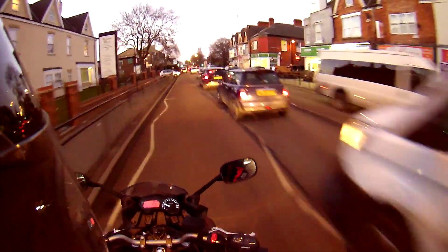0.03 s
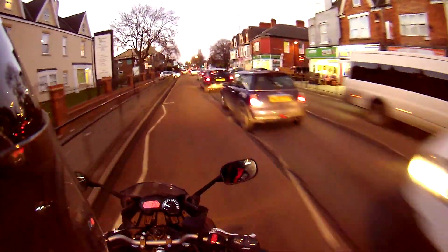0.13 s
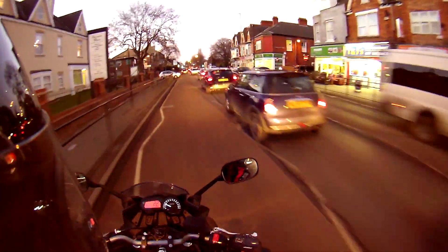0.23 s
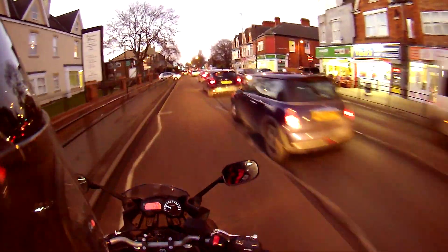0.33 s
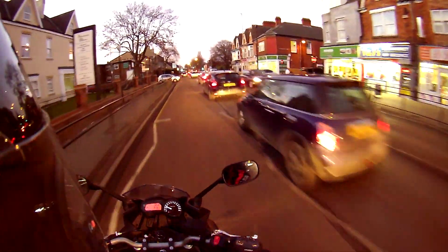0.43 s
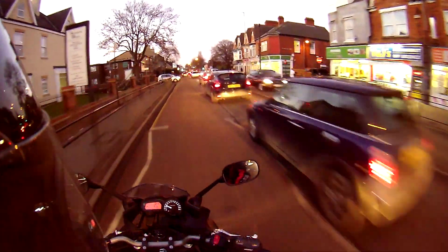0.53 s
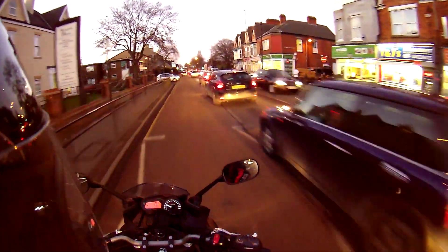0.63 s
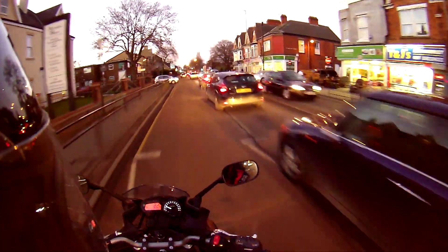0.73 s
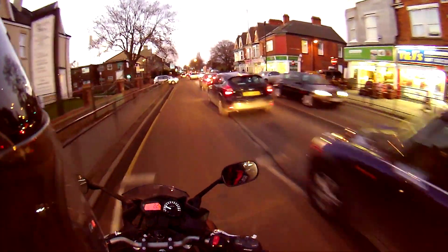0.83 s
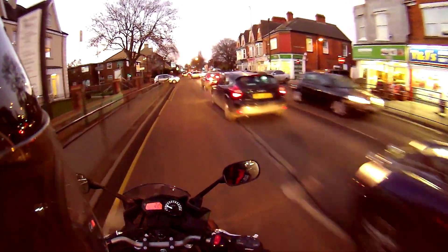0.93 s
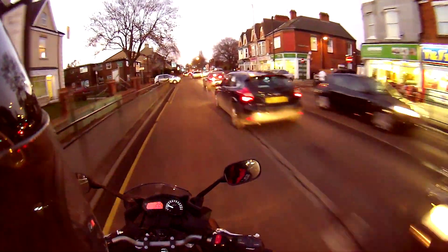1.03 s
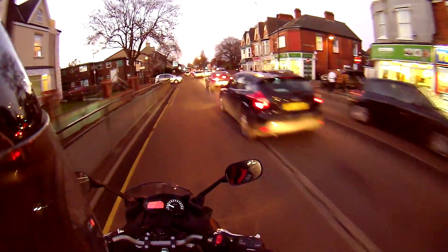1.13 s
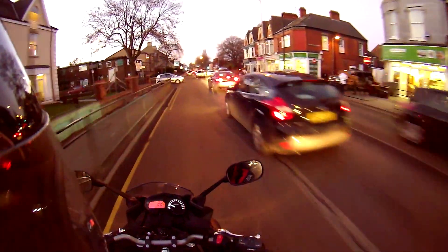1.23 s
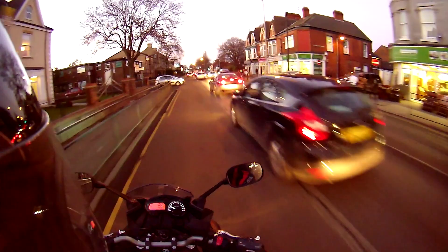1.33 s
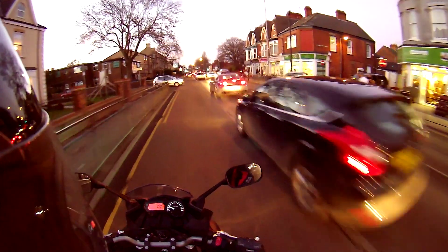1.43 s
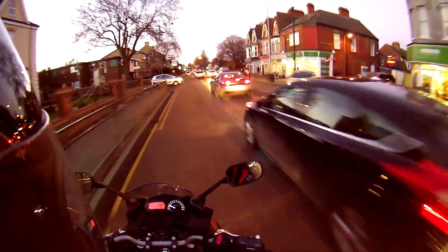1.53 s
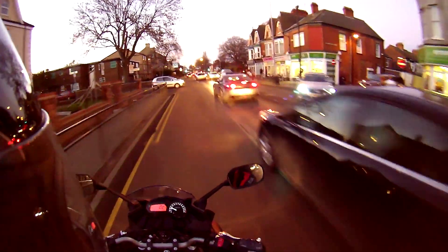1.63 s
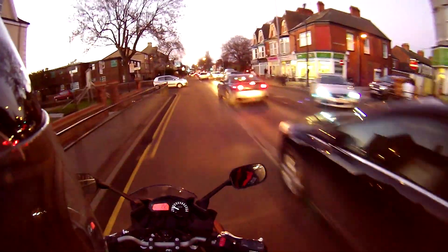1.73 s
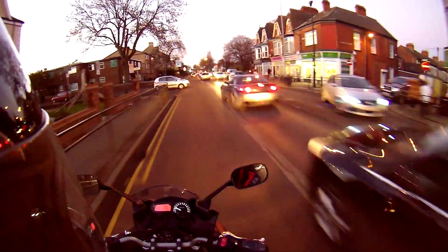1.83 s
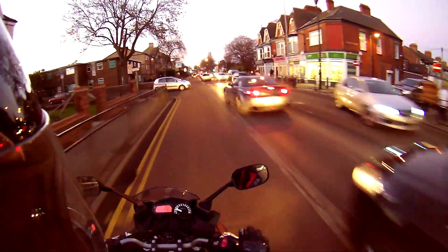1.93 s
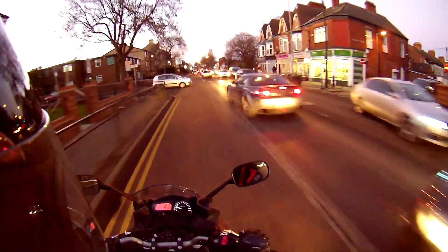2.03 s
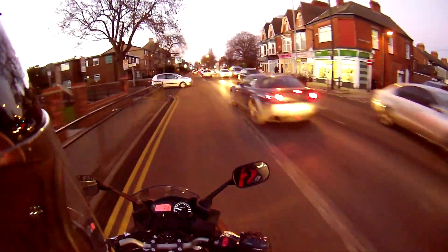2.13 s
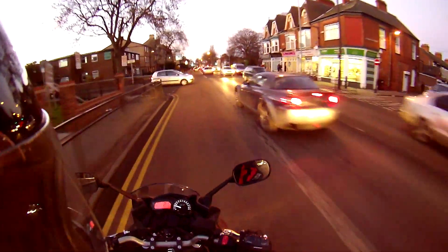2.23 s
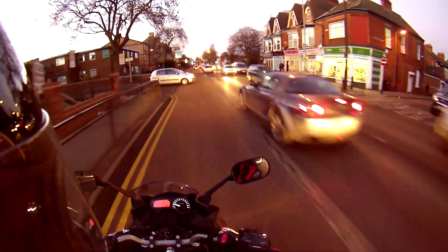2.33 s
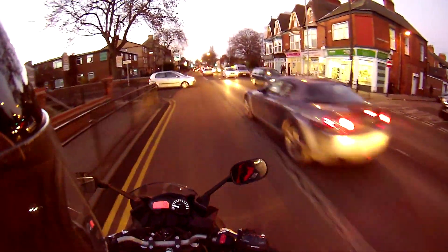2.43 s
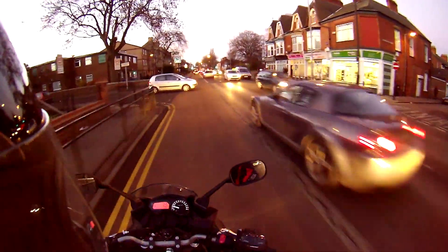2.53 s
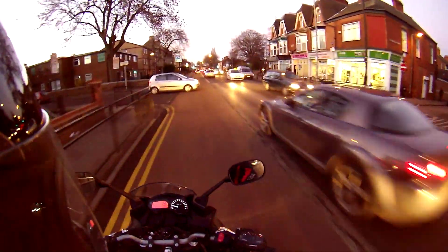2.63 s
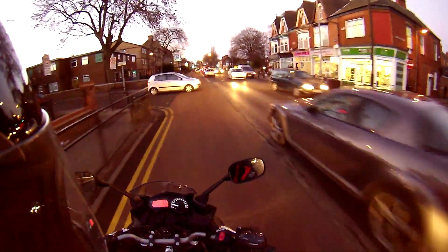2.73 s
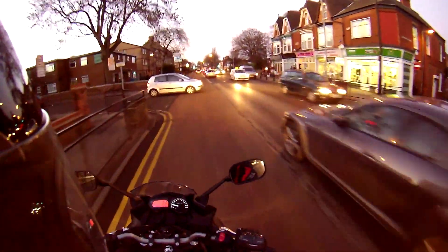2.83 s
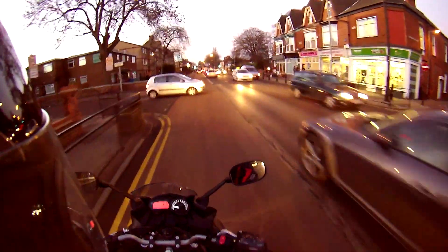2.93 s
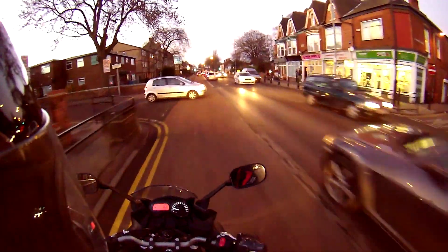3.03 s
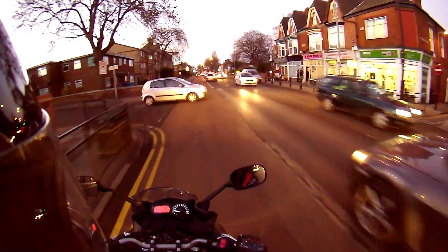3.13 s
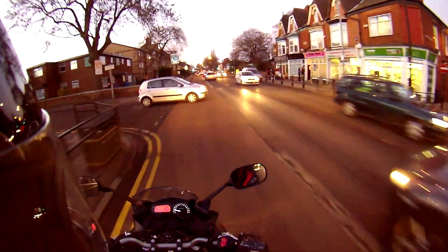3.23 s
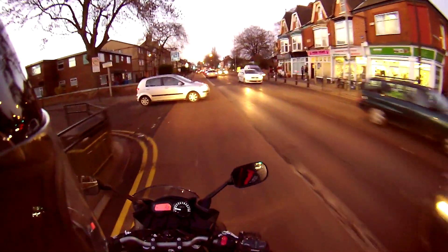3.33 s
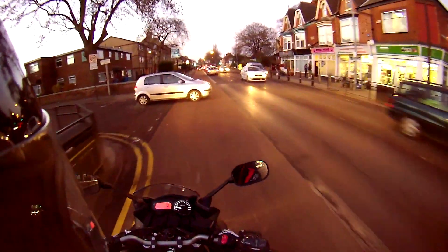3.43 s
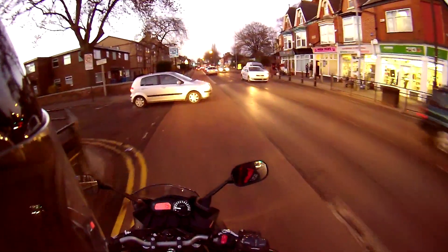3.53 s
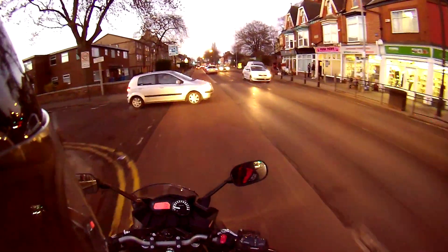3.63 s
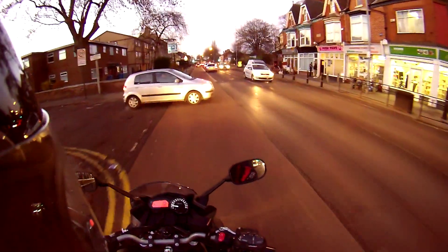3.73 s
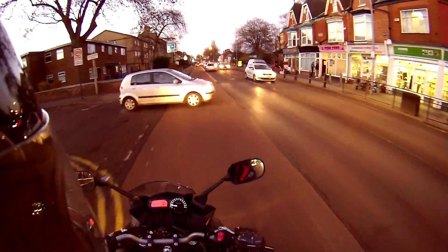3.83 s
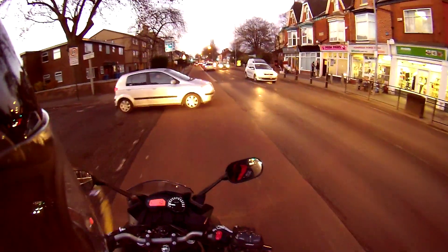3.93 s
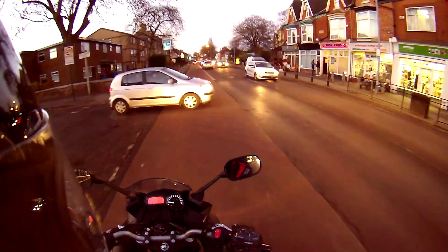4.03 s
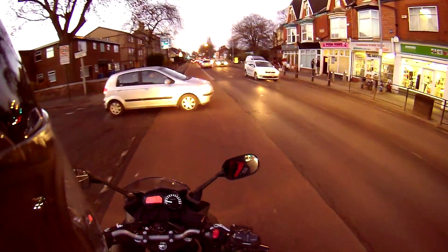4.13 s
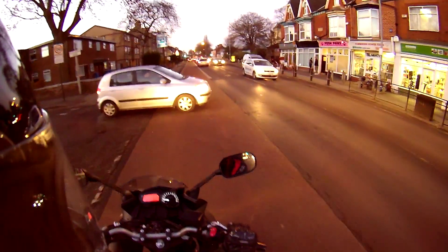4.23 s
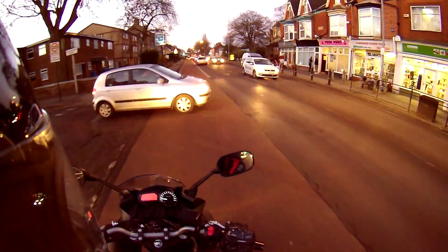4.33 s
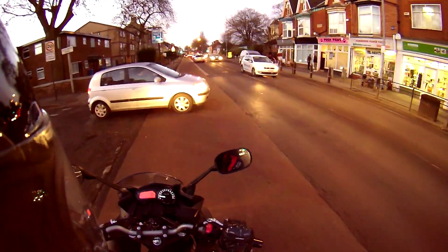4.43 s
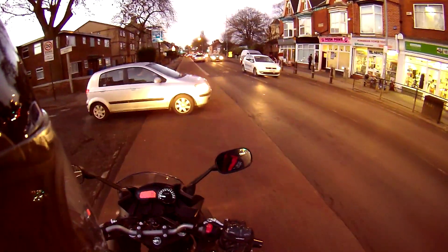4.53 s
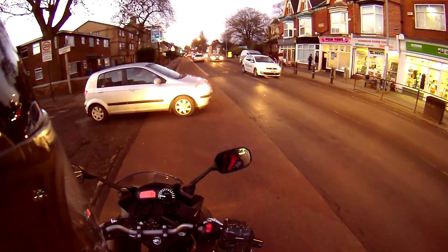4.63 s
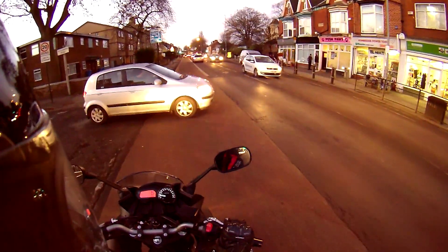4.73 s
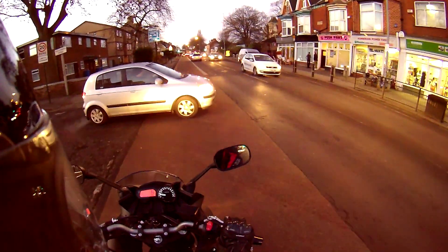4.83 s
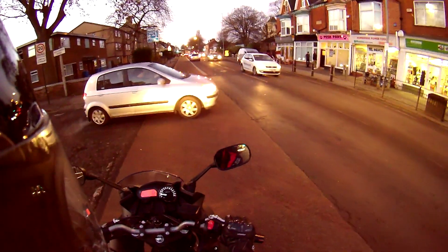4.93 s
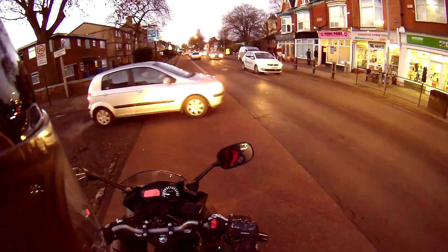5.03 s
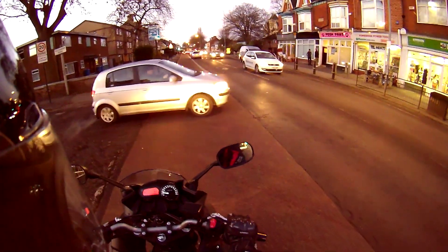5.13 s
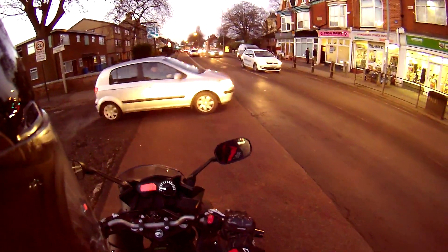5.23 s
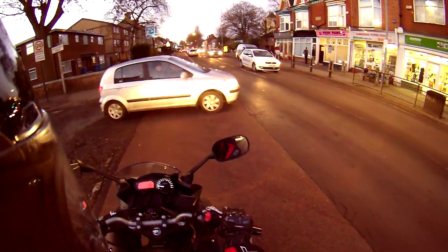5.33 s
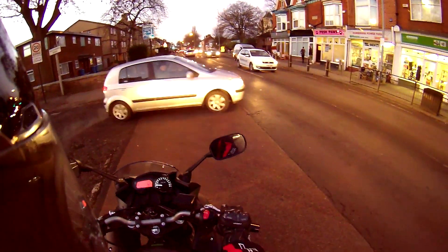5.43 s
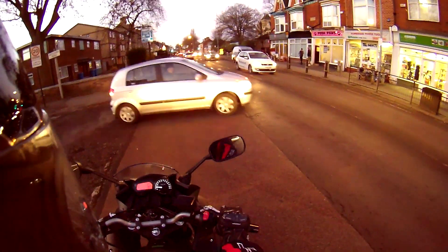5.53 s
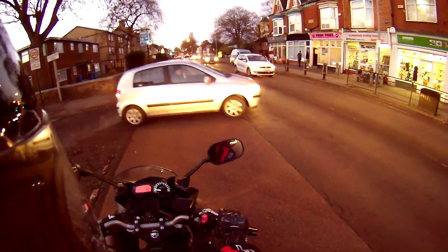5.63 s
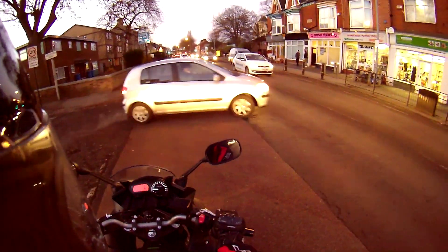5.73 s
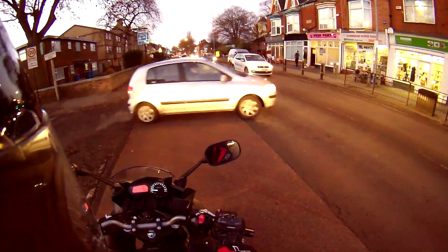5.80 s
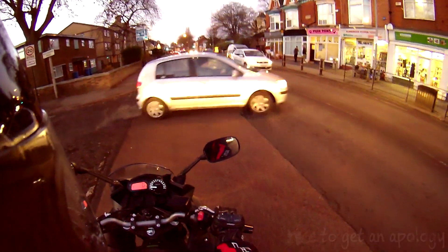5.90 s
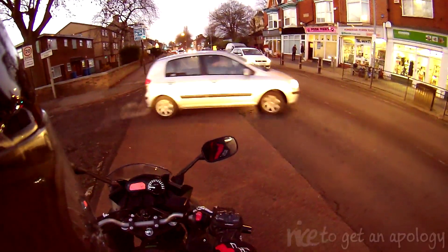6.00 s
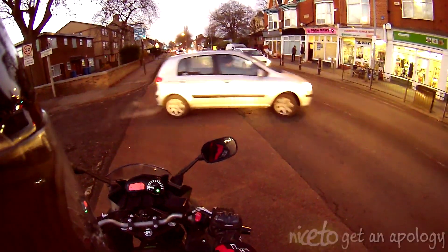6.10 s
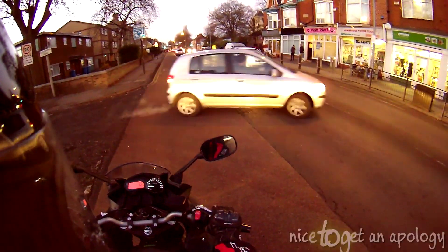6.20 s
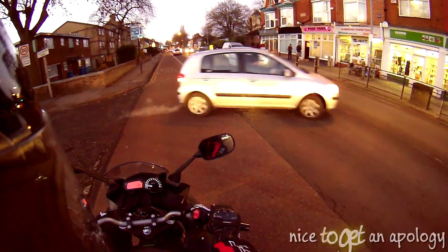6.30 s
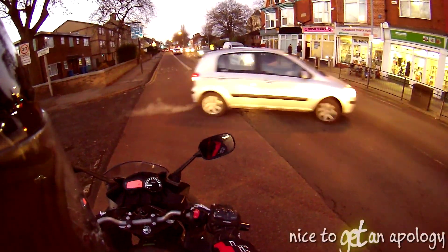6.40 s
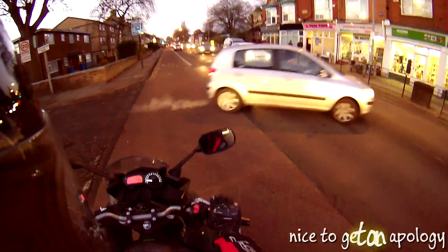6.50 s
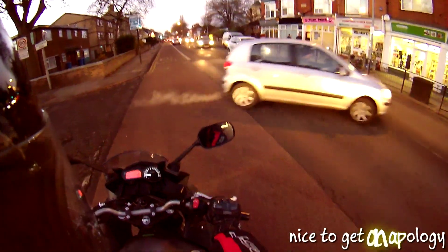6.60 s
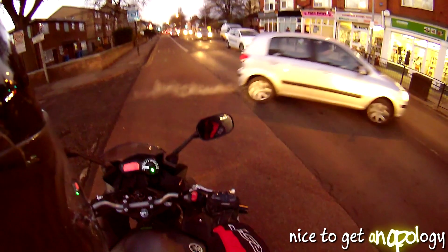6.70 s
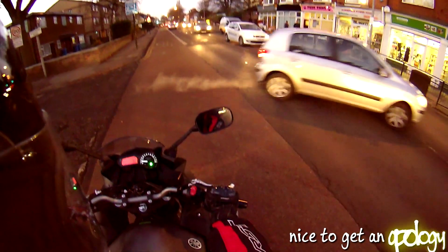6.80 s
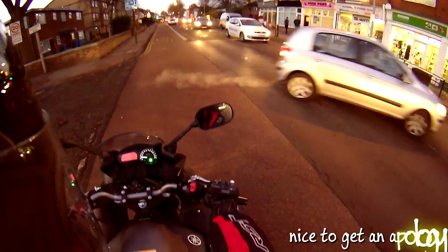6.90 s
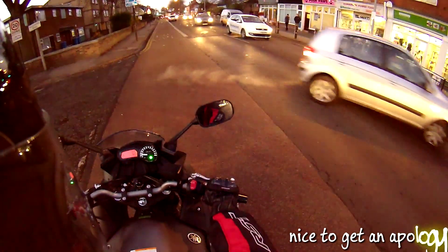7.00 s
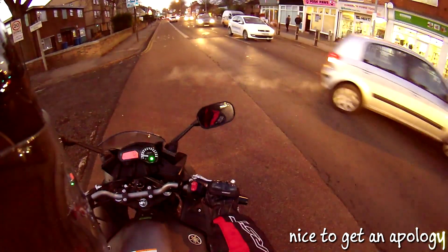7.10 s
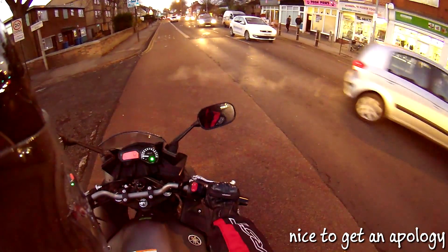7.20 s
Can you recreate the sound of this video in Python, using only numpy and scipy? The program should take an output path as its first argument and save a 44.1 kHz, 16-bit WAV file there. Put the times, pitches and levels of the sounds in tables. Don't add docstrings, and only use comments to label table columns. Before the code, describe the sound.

A motorcycle drones through wet-sounding town traffic in buffeting wind, a disc horn blares for about a second, then the engine slows to a low idle.

```python
import sys
import numpy as np
from scipy import signal
from scipy.fft import rfft, irfft, next_fast_len
from scipy.io import wavfile

SR = 44100
rng = np.random.default_rng(int(sys.argv[2]) if len(sys.argv) > 2 else 0)


def nominal_scale(level):
    x = np.asarray(level, float) / 20
    return 10 ** x


def put_to_file(sound):
    columns = np.atleast_2d(sound).T
    safe = np.clip(columns, -1, 1)
    whole_steps = np.round(safe * 32767)
    wavfile.write(sys.argv[1], SR, whole_steps.astype(np.int16))


N = 320166
T = np.arange(N) / SR

# t/s, level/dB
SPEED = [
    (0, -0.5),
    (1.9, 0.3),
    (2.3, -2),
    (3.2, -4.5),
    (3.5, -6),
    (4.2, -8.5),
    (7.26, -8),
]
HORN_ON, HORN_OFF = 1.648, 2.58


def evened(x):
    return x / np.sqrt(np.mean(x ** 2) + 1e-20)


def curves(rows):
    s, *columns = np.transpose(rows)
    return [np.interp(T, s, c) for c in columns]


def coloured(points):
    size = next_fast_len(N)
    f, db = np.transpose(points)
    hz = np.fft.rfftfreq(size, 1 / SR)
    shape = nominal_scale(np.interp(np.log(hz + 1), np.log(f + 1), db))
    spectrum = rfft(rng.standard_normal(size)) * shape
    return evened(irfft(spectrum, size)[:N])


def drift(hz):
    return coloured([(0, 0), (hz, 0), (2 * hz, -40), (4 * hz, -120)])


def resonate(x, hz, width):
    return signal.lfilter(*signal.iirpeak(hz, hz / width, SR), x)


def ringing(x, hz, width):
    return evened(resonate(resonate(x, hz, width), hz, width))


def traffic_db():
    own = nominal_scale(-53 + curves(SPEED)[0])
    crossing_s, span_s = 6.51, 2.07
    car = nominal_scale(-63) * np.exp(-((T - crossing_s) / span_s) ** 2)
    return 10 * np.log10(own ** 2 + car ** 2)


def engine():
    # t/s, f/Hz, level/dB
    running = [(0, 83.39, -4), (.3, 81.88, 0), (1.1, 82.13, -2.5), (1.5, 80.8, -3), (1.8, 79.8, -0.5),
               (2.05, 76.5, -1), (2.3, 68.5, -9.5), (2.6, 60, -2.5), (3.0, 52.75, -3.5), (3.45, 48.83, -11),
               (4.1, 47.66, -9), (4.55, 47.26, -9.5), (4.68, 48.36, -11), (4.9, 46.74, -8.5),
               (5.8, 45.54, -11), (6.7, 45.17, -9), (7.26, 45.15, -8)]
    # multiple, pulling level/dB, coasting level/dB, idle level/dB
    order_levels = [(.5, -22, -14, -9), (1, -1, 0, 5), (1.5, -12, -12, -14), (2, 2, 0, 3),
                    (2.62, -6, -20, -22), (3, -15, -12, 6), (4, -18, -14, -11), (4.6, -12, -24, -24),
                    (5, -6, -20, -15), (6, 0, -20, -14), (7, -20, -24, -20)]
    # f/Hz, width/Hz, level/dB
    cavities = [(385, 30, -1), (420, 30, -5), (500, 26, 1), (560, 90, -6), (620, 50, -11)]
    # f/Hz, width/Hz, level over the hiss band/dB
    fairing = [(1150, 60, -1), (1800, 110, -5), (2020, 130, -1), (3150, 300, -14), (4540, 120, -22),
               (5500, 40, -24), (6650, 100, -30)]
    hz, load_db = curves(running)
    turns = np.cumsum(hz * (1 + .004 * drift(3))) / SR

    orders = 0
    for k, pull_db, coast_db, idle_db in order_levels:
        waver_db = np.interp(hz, [50, 60], [.9, 1.7]) * drift(8)
        state_db = np.interp(hz, [49.5, 53, 72, 79], [idle_db, coast_db, coast_db, pull_db])
        level_db = -40.5 + 0.68 * load_db + state_db + waver_db
        orders = orders + nominal_scale(level_db) * np.sqrt(2) * np.cos(2 * np.pi * k * turns)

    uneven = nominal_scale(2.3 * rng.standard_normal(1000))[turns.astype(int)]
    puff_envelope = .45 + uneven * np.exp(-(turns % 1) / .3)
    puffs = puff_envelope * rng.standard_normal(N)
    casing = sum(nominal_scale(db) * ringing(puffs, f, w) for f, w, db in cavities)
    panels = sum(nominal_scale(db + 0.33 * drift(1.5)) * ringing(puffs, f, w) for f, w, db in fairing)
    return orders + nominal_scale(load_db - 40.5) * evened(casing) + nominal_scale(traffic_db() - 3) * panels


def road():
    # f/Hz, level/dB per Hz
    spectrum = [(30, -3.5), (60, -4.5), (150, -14), (330, -20), (600, -21), (680, -30), (1250, -30.5),
                (1550, -32.5), (2100, -38), (2300, -39.5), (3500, -47), (5000, -51), (8000, -60),
                (16000, -80.5)]
    hiss = coloured(spectrum)
    band = signal.butter(3, [850, 1120], "band", fs=SR, output="sos")
    hiss /= np.std(signal.sosfilt(band, hiss))
    return nominal_scale(traffic_db() - 1.5 + .6 * drift(20)) * hiss


def gusts():
    # t/s, length/s, strength level/dB, sharpness level/dB
    blows = [(0.073, 0.066, -23, -3), (0.235, 0.085, -26.5, 4), (0.368, 0.051, -23.5, -3),
             (0.484, 0.023, -16, -16), (0.628, 0.071, -15.5, -5), (.76, .05, -22.5, -2.5),
             (0.876, 0.055, -10.5, -10.5), (1.04, 0.089, -34.5, 5.5), (1.304, 0.2, -35.5, -3),
             (1.566, 0.067, -21, -18), (1.672, 0.036, -42, 8.5), (1.87, .07, -35, 0),
             (2.195, 0.073, -39.5, 11), (2.738, .07, -22, -6.5), (2.87, 0.038, -31.5, 11),
             (2.99, 0.064, -23.5, 1.5), (3.106, 0.067, -22.5, -1.5), (3.192, 0.046, -32.5, 11.5),
             (3.316, 0.072, -24.5, 3.5), (3.476, 0.062, -28, -4.5), (3.64, .05, -36.5, 0),
             (3.82, .04, -34, -15), (4.04, .3, -43.5, 3), (4.23, 0.087, -34.5, -2.5),
             (6.27, 0.083, -38.5, 3), (6.744, 0.052, -39.5, 0), (7.17, 0.054, -38.5, 1)]
    lull = nominal_scale(-37.5 + 2.5 * curves(SPEED)[0])
    rumble, buffet, roar = lull, nominal_scale(-4.0) * lull, nominal_scale(9.0) * lull
    for s, length, db, sharp_db in blows:
        bell = np.exp(-((T - s) / length) ** 2)
        rumble = rumble + nominal_scale(db) * bell
        buffet = buffet + nominal_scale(db + sharp_db) * bell
        roar = roar + nominal_scale(db + 1.6 * sharp_db) * bell
    return rumble, nominal_scale(-3.5) * buffet, nominal_scale(-26) * roar


def wind():
    # f/Hz, level/dB per Hz
    rumble_spectrum = [(8, 13.5), (20, 15), (35, 10.5), (60, -11), (110, -31.5), (200, -49.5), (800, -120)]
    buffet_spectrum = [(25, -21.5), (50, 5.5), (110, -4.5), (170, -14), (400, -46.5), (1200, -120)]
    roar_spectrum = [(80, -23), (150, -0.5), (250, 0), (350, -17), (600, -19), (1200, -65.5), (4000, -120)]
    low, mid, high = gusts()
    rumble = evened(np.tanh(0.5 * coloured(rumble_spectrum)))
    buffet = evened(np.tanh(1.0 * coloured(buffet_spectrum)))
    roar = evened(coloured(roar_spectrum) * nominal_scale(3.2 * drift(25)))
    return low * rumble + mid * buffet + high * roar


def electronics():
    return nominal_scale(-79) * rng.standard_normal(N)


def squeals():
    # start t/s, end t/s, f/Hz, width/Hz, level/dB
    whistles = [
        (.68, 1.45, 2430, 190, -53),
        (5.01, 5.39, 4170, 140, -66),
        (4.95, 5.42, 2100, 160, -59),
        (6.5, 6.9, 2950, 300, -70),
    ]
    out = np.zeros(N)
    for start, end, hz, width, db in whistles:
        swell = np.sin(np.pi * np.clip((T - start) / (end - start), 0, 1)) ** .4
        out += nominal_scale(db + 2.0 * drift(5.8)) * swell * ringing(rng.standard_normal(N), hz, width)
    return out


def horn_harmonics(turns, swing, hammer):
    # multiple, level/dB
    lower = [(1, -3), (2, -21), (3, -27), (4, -24), (5, -35), (6, -8), (7, -12), (8, 0), (9, -16),
             (10, -26), (11, -27), (12, -23), (13, -25)]
    # multiple, level/dB
    outline = [(14, -42), (19, -39), (28, -45), (31, -58), (34, -43), (39, -52)]
    rim = {16: 2, 17: 11, 18: -4, 19: 2, 21: -4, 26: 11, 28: 3, 29: -2}
    # t/s, level/dB
    strike = [
        (1.67, -17),
        (1.71, -17),
        (1.79, -19),
        (2.0, -20),
        (2.06, -20),
        (2.13, -17.5),
        (2.53, -17.5),
        (2.57, -20),
    ]
    low_db = -21.5
    disc_db, = curves(strike)
    bright_db = -2.5 - 1.43 * (disc_db + 17.5)
    upper = [(k, np.interp(k, *np.transpose(outline)) + rim.get(k, 0)) for k in range(14, 40)]

    out = swing * nominal_scale(low_db) * np.cos(2 * np.pi * turns)
    for k, db in lower[1:] + upper:
        db = db + low_db - lower[0][1] + .7 * drift(5)
        if k > 13:
            db = db + 2.6 * drift(3) + 1.6 * drift(50)
        if k in (5, 16, 17, 18):
            db = db + bright_db
        if k == 8:
            db = disc_db
        out += hammer * nominal_scale(db) * np.cos(2 * np.pi * (k * turns - .18 * k * k))
    return out


def loose_diaphragm(hz, released):
    free_db = -23 - 1996.5 * (T - HORN_OFF) ** 2
    phase = 2 * np.pi * np.cumsum(np.where(T < HORN_OFF, hz, 373)) / SR
    tone = np.cos(phase) + .06 * np.cos(2 * phase) + .03 * np.cos(3 * phase)
    return released * nominal_scale(free_db) * tone


def tone_disc(hammer, released):
    # f/Hz, width/Hz, rattle level/dB, ring-out level/dB, t60/s
    modes = [(2440, 80, -57, -63, .3), (2680, 70, -53, -60, .35), (2840, 80, -55, -60, .3),
             (3090, 70, -47, -58, .2), (3245, 80, -44, -56, 1.5), (3490, 80, -51, -58, .2),
             (3670, 60, -46, -60, .9), (4100, 80, -60, -63, .15), (4474, 80, -58, -62, .35)]
    since_off = np.abs(T - HORN_OFF)
    out = np.zeros(N)
    for f, width, rattle_db, ring_db, t60 in modes:
        mode = ringing(rng.standard_normal(N), f, width)
        decay = nominal_scale(ring_db - 60 * since_off / t60) * (1 + 4 * nominal_scale(-60 * since_off / .3))
        split_pair = np.cos(2 * np.pi * f * T) + .4 * np.cos(2 * np.pi * (f + 42) * T)
        out += hammer * nominal_scale(rattle_db) * mode + released * decay * (.6 * mode + split_pair)
    return out


def horn_contact(held, hammer):
    buzz = coloured([(1500, -59), (2200, -19), (3000, -6), (5000, -19), (9500, -24),
                     (12200, -40), (13800, -31), (16000, -36)])
    first_db = 14 * np.exp(-held / .03)
    settling_db = -46 - 11 * held + first_db + 1.5 * drift(15)
    last_blow = nominal_scale(-34 - 60 * np.abs(T - HORN_OFF + .004) / .04) * ringing(buzz, 4200, 2500)
    return nominal_scale(settling_db) * hammer * buzz + last_blow


def house_fronts(near):
    lag = T[:SR // 2]
    fronts = rng.standard_normal(len(lag)) * nominal_scale(-60 * lag / 0.73) * (lag > .03)
    return nominal_scale(-33) * signal.fftconvolve(near, fronts / np.linalg.norm(fronts))[:N]


def horn():
    held = np.clip(T - HORN_ON, 0, 1)
    hz = 395.25 - 1.35 * held
    shake = .0008 * evened(resonate(rng.standard_normal(N), 55, 25))
    turns = np.cumsum(hz) / SR + shake
    fall = np.clip((HORN_OFF - T) / 0.0038, 0, 1)
    released = 1 - fall
    swing = np.clip((T - HORN_ON) / .006, 0, 1) * fall
    hammer = np.clip((T - HORN_ON - .007) / 0.0054, 0, 1) * fall
    tones = horn_harmonics(turns, swing, hammer) + loose_diaphragm(hz, released)
    tones += tone_disc(hammer, released)
    near = np.sqrt(2) * tones + horn_contact(held, hammer)
    return near + house_fronts(near)


def clicks():
    # t/s, peak level/dB, centre f/Hz, width/Hz, t60/s
    taps = [
        (3.519, -58, 4500, 6000, .11),
        (3.93, -69, 4000, 5000, .07),
        (6.026, -50, 700, 500, .06),
        (6.084, -56, 3500, 1200, .08),
        (6.085, -70, 7400, 1500, .05),
        (6.12, -59, 3500, 6000, .07),
        (6.552, -69, 7000, 6000, .06),
    ]
    out = np.zeros(N)
    for s, db, hz, width, t60 in taps:
        burst = ringing(rng.standard_normal(N), hz, width)
        out += burst * nominal_scale(db - 60 * np.abs(T - s) / t60) * (T > s)
    return out


def scene():
    return (engine() + road() + wind() + electronics() + squeals() + horn() + clicks())[None]


def band_limit(x):
    return signal.sosfilt(signal.butter(12, 15640, fs=SR, output="sos"), x)


def record(dry):
    return band_limit(dry)


dry = scene()
out = record(dry)
put_to_file(out)
```